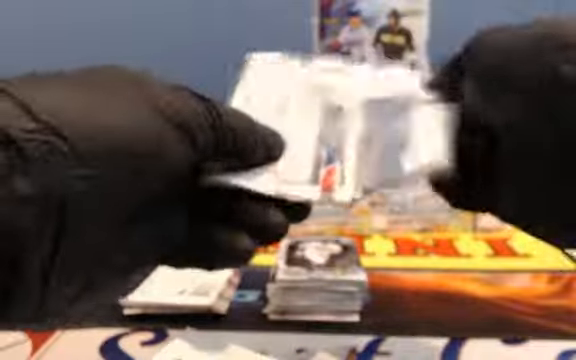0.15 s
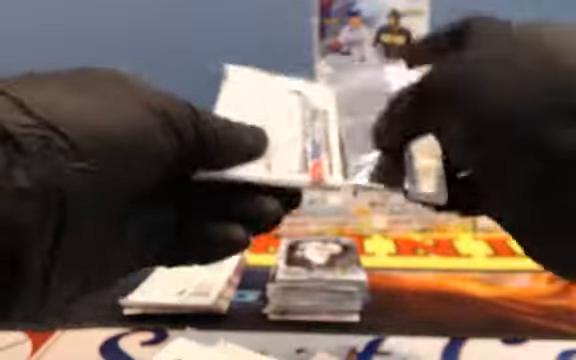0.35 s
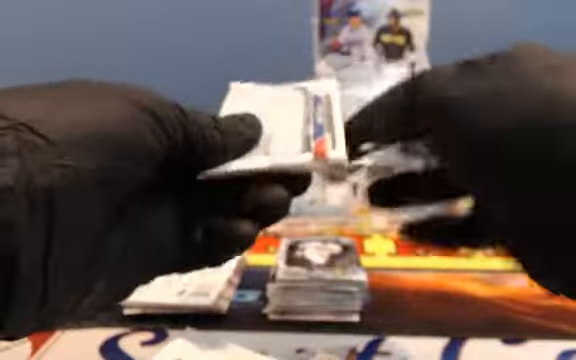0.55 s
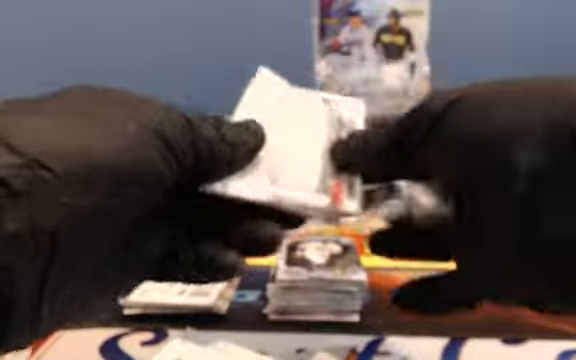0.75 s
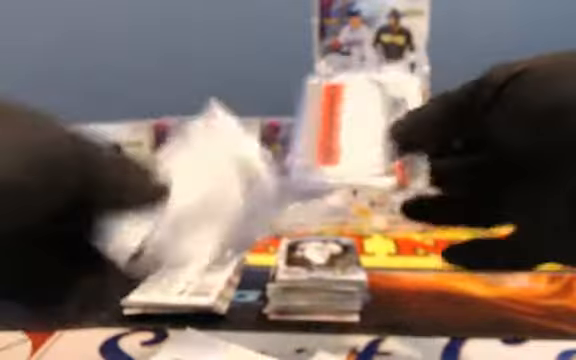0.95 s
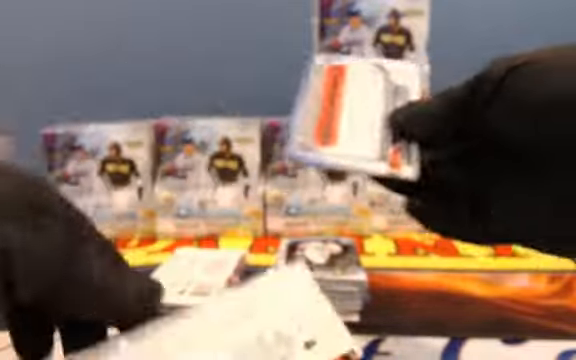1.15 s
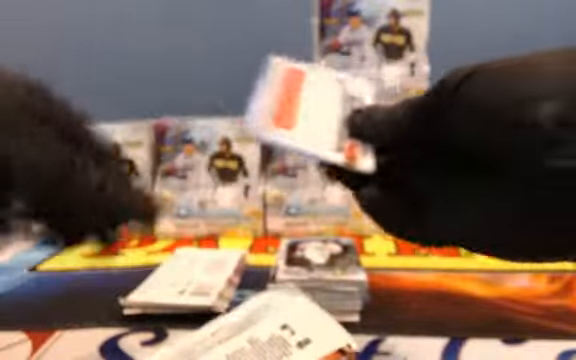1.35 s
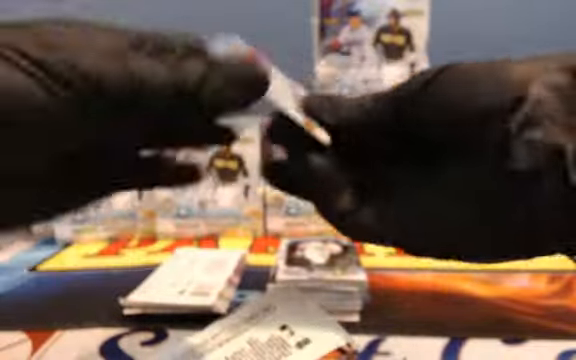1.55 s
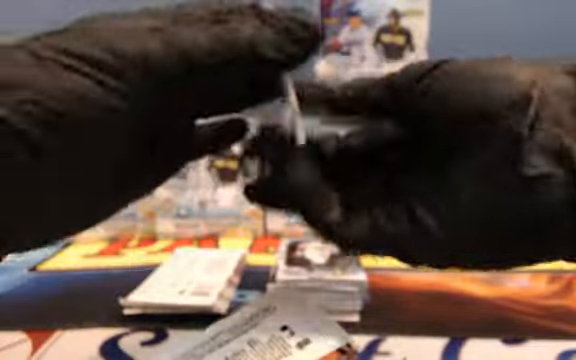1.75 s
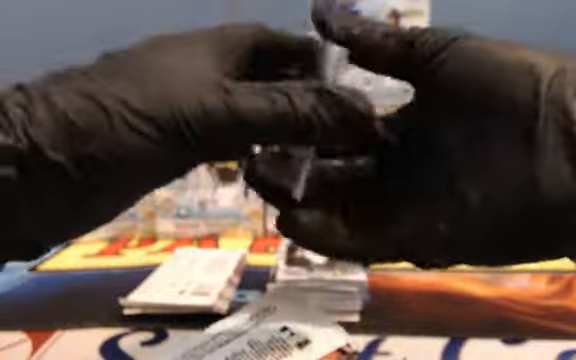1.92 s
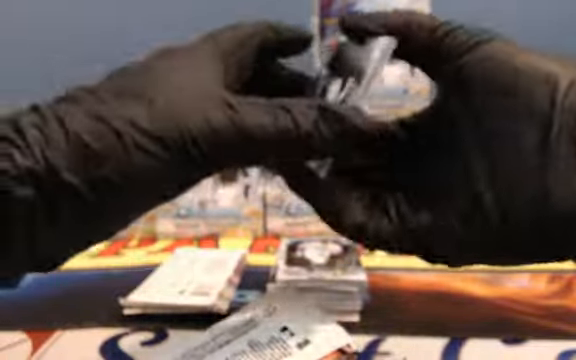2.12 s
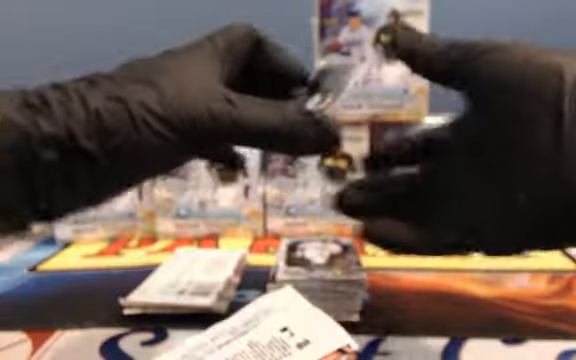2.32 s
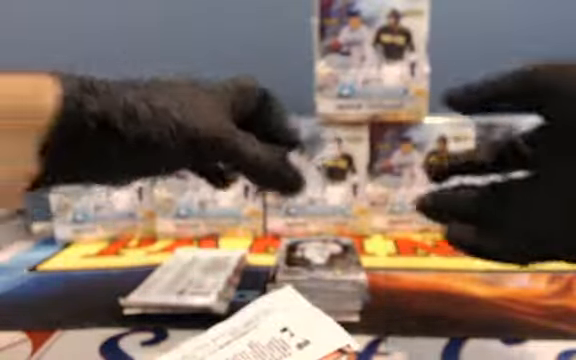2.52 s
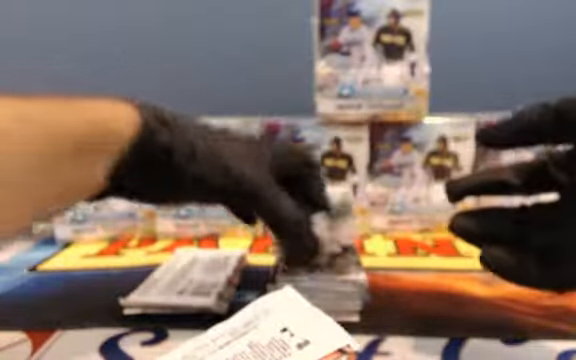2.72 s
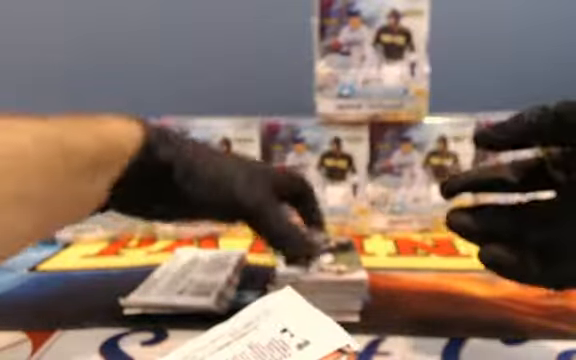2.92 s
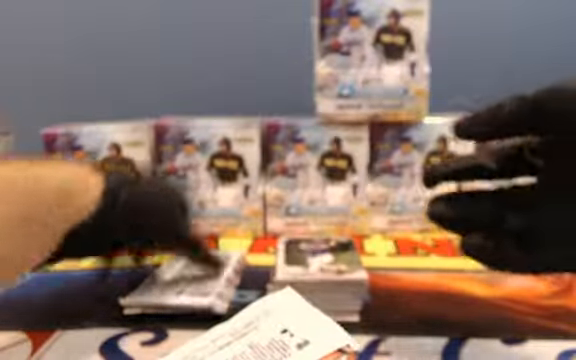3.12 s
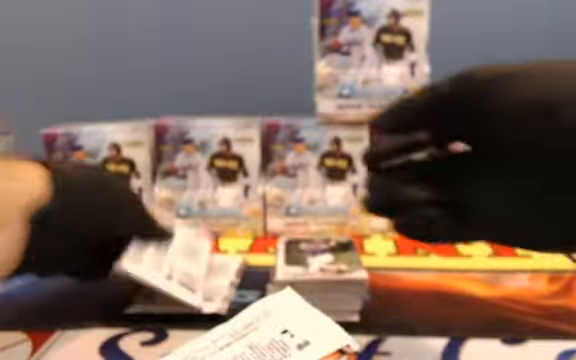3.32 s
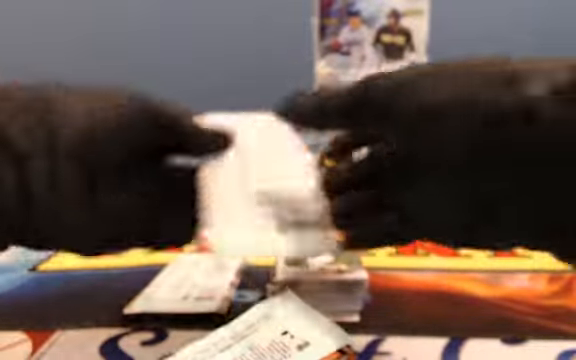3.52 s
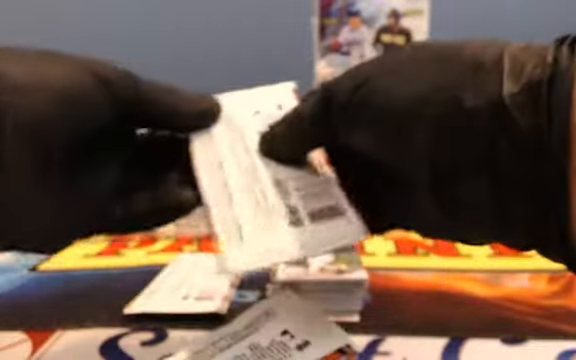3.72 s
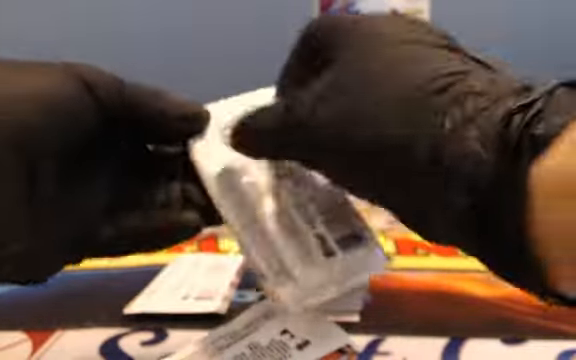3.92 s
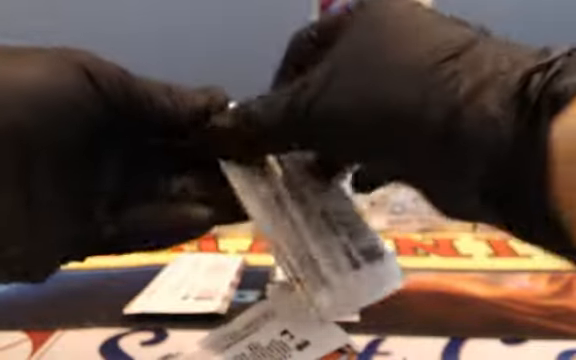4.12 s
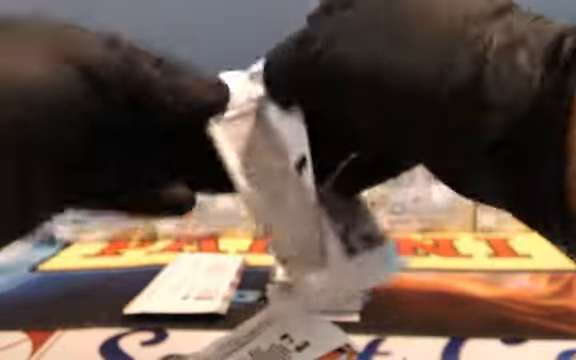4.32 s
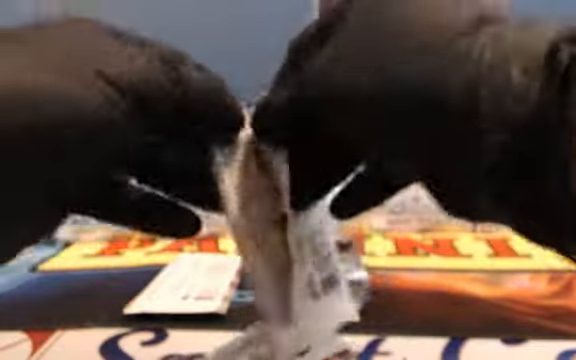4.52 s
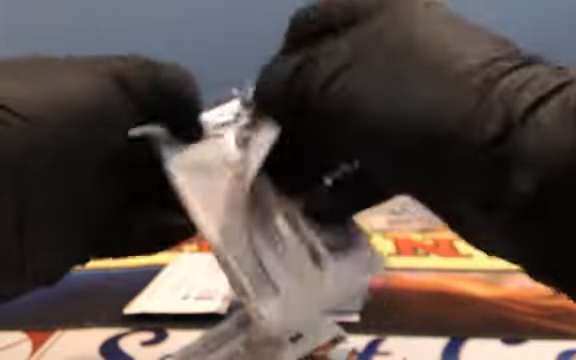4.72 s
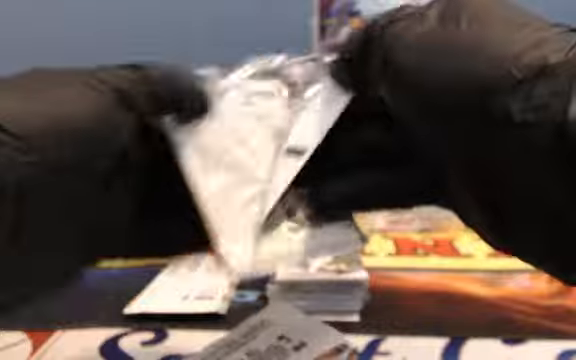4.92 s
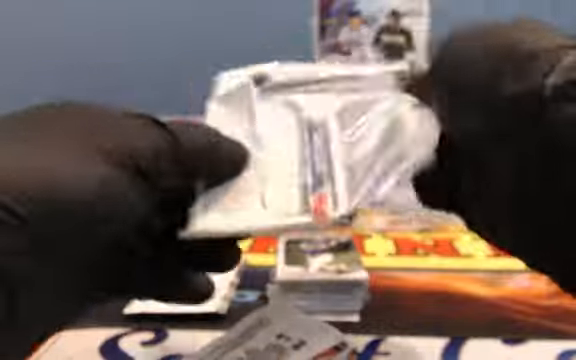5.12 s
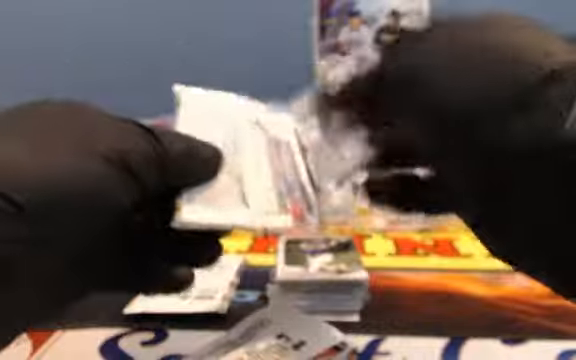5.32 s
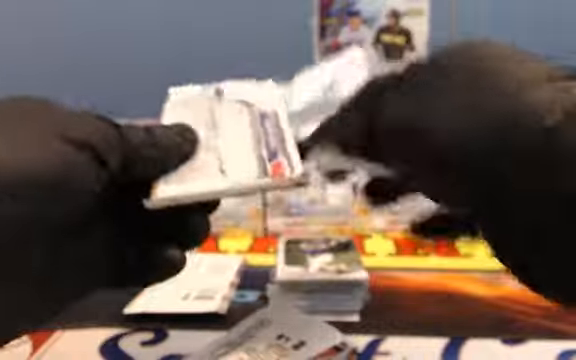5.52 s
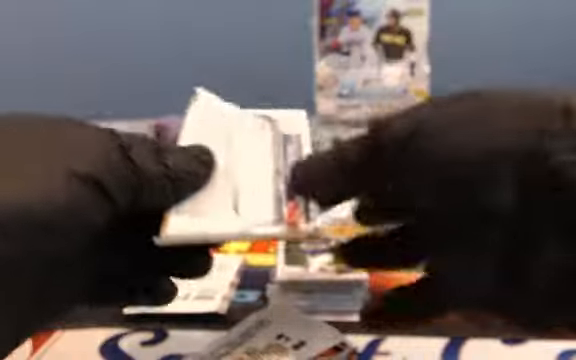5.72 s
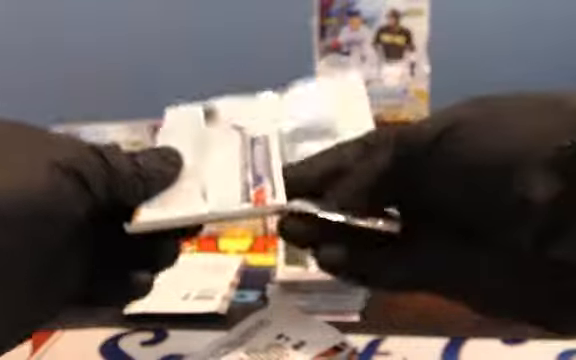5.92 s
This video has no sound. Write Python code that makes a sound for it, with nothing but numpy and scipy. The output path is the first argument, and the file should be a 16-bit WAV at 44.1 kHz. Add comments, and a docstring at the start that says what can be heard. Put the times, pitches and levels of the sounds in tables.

```python
"""Opening a foil card pack

Gloved hands handle foil card packs at a table in a small room, close to one microphone.
Cards slide from an open wrapper with two soft bumps; a new pack's seam is ripped in three pulls, then
the foil is peeled back, snapping at its creases. Foil sounds are random buckles shaped by spectra and
hand movements; panels and table are decaying sines; a fan's wavering tones hum in moving air."""
import sys
import numpy as np
from scipy import signal
from scipy.fft import rfft, irfft
from scipy.io import wavfile
from scipy.ndimage import uniform_filter1d

SR = 44100
rng = np.random.default_rng(int(sys.argv[2]) if len(sys.argv) > 2 else 0)


def dump_mix(stems):
    """Bounce the given channels to the path in sys.argv[1] as a 16-bit WAV at rate SR."""
    frames = np.atleast_2d(stems).T  # one column per channel
    limited = np.clip(frames, -1, 1)  # hard clip at full scale
    pcm = np.round(limited * 32767).astype(np.int16)
    wavfile.write(sys.argv[1], SR, pcm)


N = 262836
EDGE_HZ = 15950  # upper band edge


def amp(db):
    """Decibels to gain."""
    return 10 ** (np.asarray(db) / 20)


def unit(x):
    """Scales to rms 1."""
    return x / np.sqrt(np.mean(x ** 2) + 1e-20)


def bins(size):
    """Frequencies in Hz of a spectrum of this size."""
    return np.fft.rfftfreq(size, 1 / SR)


def at_pitch(points, hz):
    """Reads a (Hz, value) table on a log frequency axis."""
    point_hz, value = np.transpose(points)
    return np.interp(np.log(hz + 1), np.log(point_hz + 1), value)


def in_time(rows, axis=1):
    """One column of a curve at every sample."""
    rows = np.asarray(rows)
    return np.interp(np.arange(N) / SR, rows[:, 0], rows[:, axis])


def add(mix, start_s, sound):
    """Mixes a sound in at its start time."""
    part = mix[max(round(start_s * SR), 0):][:len(sound)]
    part += sound[:len(part)]


def ring_of(spectrum_db):
    """Causal minimum-phase impulse response with this spectrum, floored 80 dB below its peak."""
    log_gain = np.log(amp(np.maximum(spectrum_db, spectrum_db.max() - 80)))
    circle = np.concatenate([log_gain, log_gain[-2:0:-1]])
    return np.fft.ifft(np.exp(np.conj(signal.hilbert(circle)))).real


def stroke(start_s, length_s, rise_share, sag_db, release_s):
    """Gain of one hand movement: it builds, changes by sag_db while held, then dies away."""
    t = np.arange(N) / SR - start_s
    done = np.clip(t / length_s, 0, 1)
    held = np.minimum(done / rise_share, 1) * amp(sag_db * done ** 2)
    return held * np.exp(-np.maximum(t - length_s, 0) / release_s)


def crackle(per_s, spread_db, colour_db, variety_db, decay_s, count=16):
    """Random tiny buckles of uneven size; each facet has its own colour; rms 1."""
    hz, t = bins(size=2048), np.arange(400) / SR
    size = amp(spread_db * np.minimum(rng.exponential(1, N), 3))
    size *= rng.random(N) < per_s / SR
    size *= rng.choice([-1, 1], N)
    facet, out = rng.integers(0, count, N), np.zeros(N)
    for k in range(count):
        tint_db = variety_db * unit(uniform_filter1d(rng.standard_normal(len(hz)), size=60))
        flutter = rng.standard_normal(len(t)) * np.exp(-t / decay_s)
        grain = np.convolve(ring_of(colour_db + tint_db), flutter)
        out += signal.oaconvolve(size * (facet == k), unit(grain))[:N]
    return unit(out)


# Seam pulls, the last in two jerks and a run-out:
# start_s, length_s, force_before_trim_db, sheet_start_hz, sheet_end_hz
SEAM_PULLS = [(3.693, 0.082, -35.5, 1500, 530), (4.122, 0.18, -26.5, 1650, 633),
              (4.501, 0.037, -34.5, 1200, 1400), (4.532, 0.029, -19.5, 760, 810),
              (4.569, 0.024, -19.5, 756, 700), (4.588, 0.062, -34, 840, 600)]
# Ripping foil colour: frequency_hz, gain_db
RIP_COLOUR = [(59, -57), (100, -10), (255, -10), (289, 5.5), (350, -1), (524, 4.5), (800, -1), (1310, -5.5),
              (1800, 8), (2470, -8), (3700, -6.5), (5770, -9), (11600, -27.5), (16000, -40)]
# Peaks and dips of the pack cupped in the hands: centre_hz, width_hz, gain_db
POUCH_RESONANCES = [(340, 150, 8), (493, 93, -18), (980, 180, 1.5), (1400, 82, -13), (1795, 520, -6.5),
                    (2500, 158, -33), (3900, 230, 4)]
PULL_RISE_SHARE, PULL_SLACK_DB, PULL_RELEASE_S = 0.15, -6, 0.0092


def ripping(trim_db=-1, slips_per_s=1300, body_db=-22, fizz_db=4, sheet_db=3.0, sheet_octaves=0.75):
    """The seam gives in quick slips; the freed sheet favours sound above a pitch that glides in a pull."""
    hz = bins(size=2048)
    colour_db = at_pitch(RIP_COLOUR, hz)
    for centre_hz, width_hz, gain_db in POUCH_RESONANCES:
        colour_db += gain_db / (1 + (2 * (hz - centre_hz) / width_hz) ** 2)
    colour_db += fizz_db * (hz / EDGE_HZ) ** 2
    slips = crackle(slips_per_s, 3., colour_db, 2.5, .0005, count=40)
    # a steady pull releases energy evenly
    slips /= np.sqrt(uniform_filter1d(slips ** 2, size=800) + 1e-3)
    row_hz, frame_s, spectrum = signal.stft(slips, SR, nperseg=256)
    row_hz = row_hz[:, None]
    out = np.zeros(N)
    for start_s, length_s, force_db, start_hz, end_hz in SEAM_PULLS:
        freed = np.sin(np.pi / 2 * np.clip((frame_s - start_s) / length_s, 0, 1)) ** 2
        sheet_hz = start_hz + (end_hz - start_hz) * freed
        radiated = amp(body_db) + 1 / np.sqrt(1 + (1.19 * sheet_hz / (row_hz + 1)) ** 6)
        # first resonance of the sheet
        away_octaves = np.log2((row_hz + 1) / (1.47 * sheet_hz))
        radiated *= amp(sheet_db * np.exp(-(away_octaves / sheet_octaves) ** 2))
        sheet = signal.istft(spectrum * radiated, SR, nperseg=256)[1][:N]
        pull = stroke(start_s, length_s, PULL_RISE_SHARE, PULL_SLACK_DB, PULL_RELEASE_S)
        out += sheet * amp(force_db + trim_db) * pull
    return out


# Buckling creases and clicking card edges:
# start_s, level_before_trim_db, centre_hz, spread_octaves, flutter_ms
CREASE_SNAPS = [(0.057, -42.5, 3430, 0.17, 1.1), (0.0844, -31.5, 5140, 1.34, 4.4),
                (0.0947, -41, 6740, 0.53, 1.7), (0.131, -51, 4360, 0.69, 1.5),
                (0.2628, -42.5, 4150, 0.73, 2.6), (.2909, -39.5, 4550, 0.73, 2.5),
                (.344, -41, 3640, 0.42, 2), (0.4203, -47.5, 3850, .8, 2.7), (0.5007, -53, 2860, 0.75, 2.2),
                (0.577, -51, 1840, 0.36, 2.3), (.608, -44.5, 3460, 0.71, 3.3), (2.248, -36, 4900, 1, 1.6),
                (2.2565, -43.5, 1140, 1.3, 4.7), (2.3983, -56.5, 3650, 0.37, 1.4),
                (2.7027, -47.5, 7350, 0.49, 1.1), (2.762, -50.5, 2500, 0.96, 8.1),
                (2.781, -48.5, 6950, 1.1, 1.3), (2.8718, -52.5, 3950, 0.53, 3.9),
                (2.9446, -56.5, 3900, 0.72, 1.8), (3.0063, -44.5, 5500, 0.41, 3),
                (3.065, -50, 3600, .5, 3.7), (3.087, -47, 3830, .6, 1.4), (3.149, -41.5, 3950, 0.47, .8),
                (3.1581, -45.5, 2820, 0.56, 2.1), (3.2356, -51.5, 4350, 1.2, 3.4),
                (3.4043, -46.5, 5230, 0.75, 3.1), (3.451, -34, 4380, .65, 3.3), (3.57, -49, 5300, .45, 1.4),
                (3.6274, -34.5, 6440, 0.55, 2), (3.6351, -34.5, 5000, 0.82, 3.6),
                (3.6602, -27, 5200, 0.63, 3.2), (3.6708, -25.5, 6200, 0.36, 1.8),
                (3.6957, -28, 4350, 1.34, 1.8), (3.7093, -25, 4900, .4, 5.8),
                (3.728, -24.5, 3900, 0.73, 1.2), (3.8683, -44.5, 6100, .8, 1.4),
                (3.941, -31.5, 4500, 0.27, 0.93), (3.949, -28.5, 3400, 0.87, 2.5),
                (3.955, -33.5, 3100, 0.97, 1.7), (3.9845, -34.5, 3900, 0.6, 1.2),
                (4.0873, -39.5, 4360, 0.39, 1.6), (4.1002, -40, 3080, 0.38, 1.5),
                (4.1133, -31, 3320, 0.55, 1.2), (4.1549, -20, 3000, 0.7, 2),
                (4.283, -25.5, 2500, 0.31, 4.7), (4.3304, -24.5, 3040, 1.38, 2.6),
                (4.3785, -32, 7150, 0.3, 1.3), (4.415, -33, 2720, 0.65, 2.1), (4.47, -39, 4800, .5, 2.2),
                (4.4924, -29.5, 2400, 1.1, 7.1), (4.5179, -24, 3740, 1.57, 4.3),
                (4.544, -21.5, 3100, 1.32, 1.6), (4.5697, -19.5, 2880, 1.4, 5),
                (4.6765, -26.5, 3300, .7, 1.5), (4.7236, -34.5, 2915, 0.61, 6.1),
                (4.8255, -32.5, 2560, 0.62, 2.3), (4.841, -32, 3530, 0.65, 1.9),
                (4.8464, -27, 3100, 1.46, 2.15), (4.898, -47, 1500, 1.2, 2.5),
                (4.9072, -36.5, 4700, 0.9, 1.6), (4.9154, -35, 2840, 1.2, 2.4),
                (4.9636, -24, 4560, 0.45, 1.5), (5.0049, -34.5, 4530, 0.55, 1.9),
                (5.0365, -28, 3160, 0.59, 1.2), (5.127, -40.5, 2550, .6, 1.6), (5.1545, -42, 3340, .4, 3.4),
                (5.23, -38.5, 4070, 0.83, 2.8), (5.2507, -31.5, 2630, 0.25, 1.25),
                (5.2557, -34.5, 4950, 0.84, 5.5), (5.3079, -27.5, 4240, 0.73, 4.4),
                (5.3794, -26, 7540, 0.45, 2), (5.526, -40.5, 5800, 0.54, 1.3),
                (5.5834, -34.5, 4440, 0.86, 6.7), (5.6097, -31.5, 4500, 0.59, 2.3),
                (5.6716, -43, 3900, 0.38, 1.8), (5.765, -45.5, 4260, 0.7, 2.5),
                (5.7939, -39.5, 3500, 0.78, 2.1), (5.866, -42.5, 4630, 0.67, 2.5),
                (5.9159, -35, 3900, 0.93, 2.6)]


def snaps(trim_db=-2.5, crack_db=-22, soft_db=-38, sharpening=0.17, kick=2.8,
          top_hz=10000, top_db=-7, after_db=-12, after_s=.013):
    """A crease flips with a sharp kick and flutters for milliseconds; three smaller creases follow."""
    out, hz, t = np.zeros(N), bins(size=512), np.arange(512) / SR
    for start_s, level_db, centre_hz, octaves, flutter_ms in CREASE_SNAPS:
        away = np.log2((hz + 1) / centre_hz) / max(octaves, .2)
        hump = np.exp(-away ** 2 / 2) * centre_hz / (hz + centre_hz / 2)
        sharp_db = sharpening * (level_db - soft_db)  # harder snaps are sharper
        crack = amp(crack_db + sharp_db) ** 2 * hz ** 2 / (hz ** 2 + 600 ** 2)
        crack /= 1 + (hz / top_hz) ** 4
        treble_db = (top_db + sharp_db) / (1 + (top_hz / (hz + 1)) ** 8)
        facet = ring_of(10 * np.log10(hump + crack + 1e-9) + treble_db)
        flutters = rng.standard_normal((4, len(t))) * np.exp(-(t * 1000 / flutter_ms) ** 2)
        flutters[:, 0] = kick
        delays_s = np.cumsum(rng.exponential(after_s, len(flutters)))
        for k, flutter in enumerate(flutters):
            snap = np.convolve(facet, flutter)
            snap /= np.sqrt(np.sum(snap ** 2) / (.004 * SR))  # energy of 4 ms at rms 1
            gain = amp(level_db + trim_db + after_db * np.sqrt(k))
            add(out, start_s + delays_s[k] - delays_s[0], gain * snap)
    return out


# Foil pouch popping in or out as a whole: start_s, level_before_trim_db, pitch_hz
PANEL_POPS = [(0.083, -45, 980), (0.312, -48, 1090), (3.728, -31, 1340), (4.2865, -33.5, 680),
              (4.331, -25, 980), (4.415, -42.5, 750), (4.4927, -31.5, 980), (4.519, -35, 1030),
              (4.571, -20, 945), (4.847, -37.5, 700), (4.897, -33, 870), (4.916, -43, 716),
              (5.308, -38, 980), (5.794, -41, 1830)]


def pops(trim_db=-1, rise_s=0.00058, decay_s=0.0028):
    """A whole panel flips through and rings for a few cycles."""
    out, t = np.zeros(N), np.arange(1500) / SR
    for start_s, level_db, pitch_hz in PANEL_POPS:
        shape = (1 - np.exp(-t / rise_s)) * np.exp(-t / decay_s)
        ring = np.sin(2 * np.pi * pitch_hz * t)
        add(out, start_s, amp(level_db + trim_db) * 2 * shape * ring)
    return out


# Finger grips on foil and cards: start_s, length_s, level_before_trim_db
FINGER_GRIPS = [(0, 0.034, -44.5), (0.113, 0.15, -66), (0.259, 0.054, -49.5), (0.448, 0.13, -67),
                (0.658, 0.038, -71), (2.743, 0.12, -69.5), (3.054, 0.06, -59.5), (3.248, 0.047, -65),
                (3.442, 0.057, -48.5), (3.618, 0.025, -49.5), (3.679, 0.15, -52), (3.839, 0.079, -51.5),
                (4.1, .28, -38.5), (4.4, 0.15, -48.5), (4.617, .11, -43.5), (4.813, .05, -51.5),
                (4.894, 0.028, -47), (4.972, 0.085, -48), (5.16, 0.054, -67.5), (5.25, .15, -49),
                (5.5, 0.035, -59), (5.576, 0.043, -56), (5.658, .045, -65), (5.78, 0.075, -62),
                (5.9, 0.092, -50)]
# Light rustle colour: frequency_hz, gain_db
RUSTLE_COLOUR = [(200, -27), (700, -12.5), (1500, -1), (3000, 3), (5000, 2), (8000, 2), (11000, -9.5),
                 (16000, -24.5)]
GRIP_RISE_SHARE, GRIP_SWELL_DB, GRIP_RELEASE_S = 0.13, 1, 0.012
HOLDING_BEFORE_TRIM_DB = -86.5  # constant faint rustle of held cards
FIRM_DB, LIGHT_TOP_HZ = -55.5, 7600  # effort of an even firm/dull blend; dull treble corner


def rustle(trim_db=-2.0, ticks_per_s=330, rub_db=-7):
    """Small crinkles over the fine rub of gloves and cards on foil; a light touch is duller."""
    colour_db = at_pitch(RUSTLE_COLOUR, bins(size=2048))
    ticks = crackle(ticks_per_s, 4.85, colour_db, 3.1, 0.0014, count=24)
    rub = crackle(4000, 2.3, colour_db, 5.0, 0.00031, count=24)
    effort = np.full(N, amp(HOLDING_BEFORE_TRIM_DB))
    for start_s, length_s, level_db in FINGER_GRIPS:
        grip = stroke(start_s, length_s, GRIP_RISE_SHARE, GRIP_SWELL_DB, GRIP_RELEASE_S)
        effort += amp(level_db) * grip
    bright = ticks + amp(rub_db) * rub
    dull = irfft(rfft(bright) / (1 + (bins(N) / LIGHT_TOP_HZ) ** 4), N)
    firm = effort / (effort + amp(FIRM_DB))
    return (firm * bright + (1 - firm) * dull) * amp(trim_db) * effort


# Cards sliding over one another: start_s, length_s, level_db
CARD_SLIDES = [(1.232, .12, -77), (2.63, .04, -71), (2.82, .08, -69.5), (3.02, .16, -68)]
SLIDE_HZ, SLIDE_OCTAVES = 4630, 0.43  # card hiss: centre, spread


def slides(rise_share=0.37, sag_db=-5, release_s=0.057):
    """Card on card: dense tiny buckles make a soft, fine-grained swish."""
    away = np.log2((bins(size=2048) + 1) / SLIDE_HZ) / SLIDE_OCTAVES
    hiss = crackle(5000, 2., -30 * np.log10(1 + away ** 2), 2., .0005, count=8)
    effort = np.zeros(N)
    for start_s, length_s, level_db in CARD_SLIDES:
        effort += amp(level_db) * stroke(start_s, length_s, rise_share, sag_db, release_s)
    return hiss * effort


# Hands and cards on padded table or pack:
# start_s, level_before_trim_db, pitch_hz, rise_s, decay_s
SOFT_BUMPS = [(2.256, -41, 634, 0.0028, 0.0039), (2.261, -36.5, 112, 0.0089, 0.016),
              (2.645, -39, 100.7, 0.0075, 0.03), (3.708, -45, 329, 0.0024, 0.018),
              (4.33, -34, 340, 0.0037, 0.0025), (4.539, -40, 246.5, 0.0034, 0.067),
              (4.575, -28.5, 355.4, 0.00081, 0.022), (4.726, -40.5, 293, 0.0033, 0.0067),
              (4.815, -42.5, 300, 0.0051, 0.018), (4.912, -42.5, 362, 0.0023, 0.0022)]


def bumps(trim_db=-2, overtone=1.5, overtone_db=-12, thud_db=-7):
    """A soft push excites a decaying swing with one overtone and a dull noise thud."""
    out, t = np.zeros(N), np.arange(SR // 4) / SR
    for start_s, level_db, pitch_hz, rise_s, decay_s in SOFT_BUMPS:
        swing = np.sin(2 * np.pi * pitch_hz * t)
        swing += amp(overtone_db) * np.sin(2 * np.pi * pitch_hz * overtone * t)
        band = signal.butter(2, [pitch_hz * 0.5, pitch_hz * 1.54], "band", fs=SR, output="sos")
        thud = unit(signal.sosfilt(band, rng.standard_normal(len(t))))
        shape = np.minimum(t / rise_s, 1) * np.exp(-np.maximum(t - rise_s, 0) / decay_s)
        add(out, start_s, amp(level_db + trim_db) * shape * (swing + amp(thud_db) * thud))
    return out


# Room air colour: frequency_hz, relative_db
AIR_COLOUR = [(15, -79), (25, -14), (175, 0), (373, -7), (405, -9), (439, -16.5), (624, -7), (936, -7.5),
              (1020, -6), (1330, -13.5), (1480, -12.5), (1610, -13), (4740, -29), (5730, -31), (16000, -58)]
AIR_BEFORE_DRIFT_DB = -69
# Fan tones: pitch_hz, level_before_drift_db
FAN_TONES = [(166.9, -86), (414.5, -84.5), (624.5, -86.5), (829.0, -84), (985.1, -78), (1039, -87),
             (1249, -84.5), (1453, -78.5)]
# Slow background drift: time_s, gain_db
BACKGROUND_DRIFT = [(0, 7), (.6, 3), (1.2, -1), (2.1, -3.5), (2.6, 2.5), (3.3, 4), (5.96, 5)]


def background(waver_hz=2.8):
    """Moving air as coloured noise, plus fan tones whose pitch wavers randomly."""
    air_gain = amp(at_pitch(AIR_COLOUR, bins(N)))
    air = unit(irfft(rfft(rng.standard_normal(N)) * air_gain, N))
    fan = np.zeros(N)
    for pitch_hz, level_db in FAN_TONES:
        waver = waver_hz * unit(uniform_filter1d(rng.standard_normal(N), size=1500))
        phase = 2 * np.pi * np.cumsum(pitch_hz + waver) / SR
        fan += amp(level_db) * np.sqrt(2) * np.sin(phase)
    return (amp(AIR_BEFORE_DRIFT_DB) * air + fan) * amp(in_time(BACKGROUND_DRIFT))


# Room ring colour: frequency_hz, gain_db
WALL_COLOUR = [(200, 0), (1000, 0), (3000, -2), (6000, -1), (8500, 2), (11000, 0), (16000, -2)]


def tail(build_s=0.0009):
    """Diffuse reflections of energy 1; air and soft furnishings take the treble first."""
    hz, t, spectrum = signal.stft(rng.standard_normal(SR // 2), SR, nperseg=256)
    t60_s = .38 / (1 + (hz / 15000) ** 2)
    fade_db = at_pitch(WALL_COLOUR, hz)[:, None] - 60 * t / t60_s[:, None]
    ring = signal.istft(spectrum * amp(fade_db), SR, nperseg=256)[1]
    ring *= 1 - np.exp(-np.arange(len(ring)) / SR / build_s)
    return ring / np.linalg.norm(ring)


# Table, box and wall echoes: mean_delay_s, gain
NEAR_ECHOES = [(.0012, 0.43), (.0098, 0.12), (0.0107, -0.11)]


def room(x, wet_db=-9, moves_per_s=1.7, reach_s=.0005, count=4):
    """Near echoes whose delays sway as the hands move, and a diffuse ring cycling among random tails."""
    n = np.arange(N)
    out, place = x.copy(), 2 * np.pi * moves_per_s * n / SR
    for delay_s, gain in NEAR_ECHOES:
        path_s = delay_s + reach_s * np.sin(place + rng.uniform(0, 2 * np.pi))
        out += gain * np.interp(n - np.round(path_s * SR), n, x, left=0)
    turn = 2 * np.pi * 45 * n / SR  # 45 Hz
    ring = np.zeros(N)
    for k in range(count):
        share = np.cos(turn + np.pi * k / count) * np.sqrt(2 / count)
        ring += signal.fftconvolve(x * share, tail())[:N]
    return out + amp(wet_db) * ring


def scene():
    """Foil and cards in the room, with table bumps and the fan added directly."""
    handling = snaps() + pops() + ripping() + rustle() + slides()
    return (room(handling) + bumps() + background())[None]


def record(dry, bass_hz=62):
    """The microphone's bass roll-off and the recorder's upper band limit."""
    high_pass = signal.butter(2, bass_hz, "high", fs=SR, output="sos")
    thin = signal.sosfilt(high_pass, dry)
    low_pass = signal.firwin(511, EDGE_HZ, window=("kaiser", 9), fs=SR)
    return signal.oaconvolve(thin, low_pass[None], "same")


dry = scene()
out = record(dry)
dump_mix(out)
```